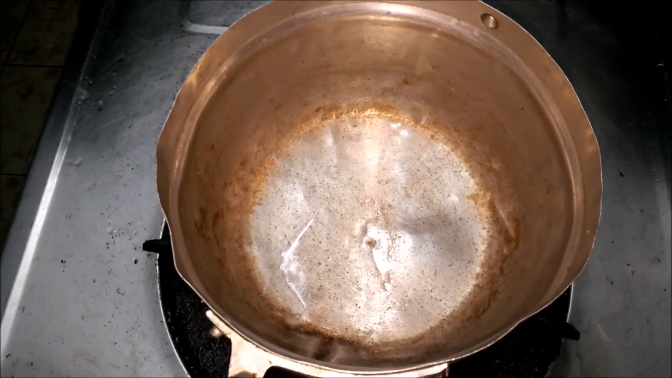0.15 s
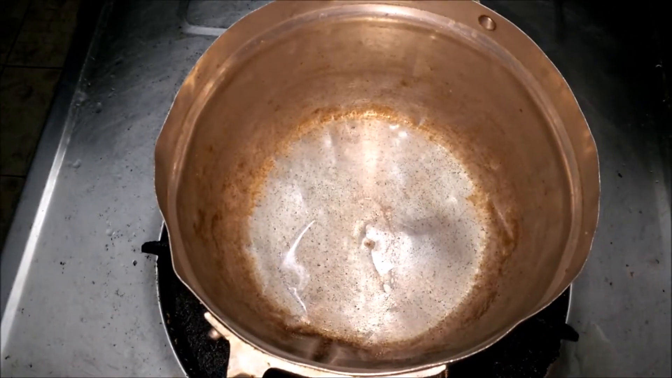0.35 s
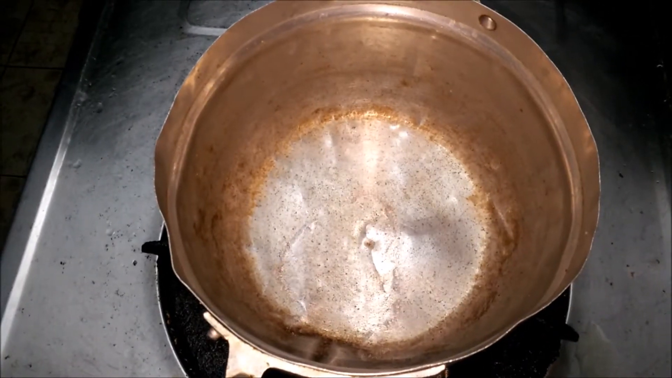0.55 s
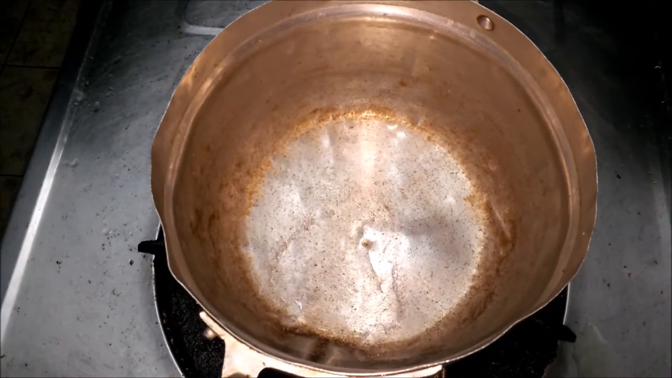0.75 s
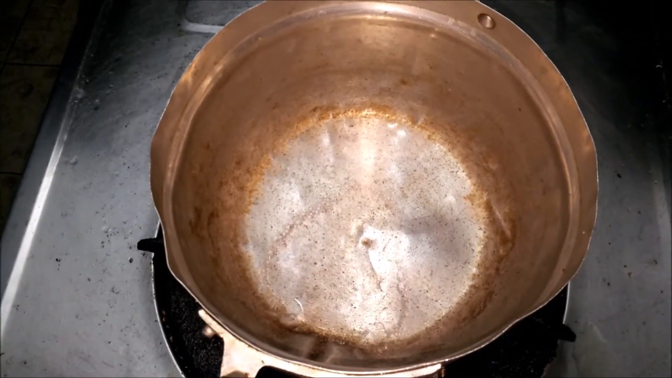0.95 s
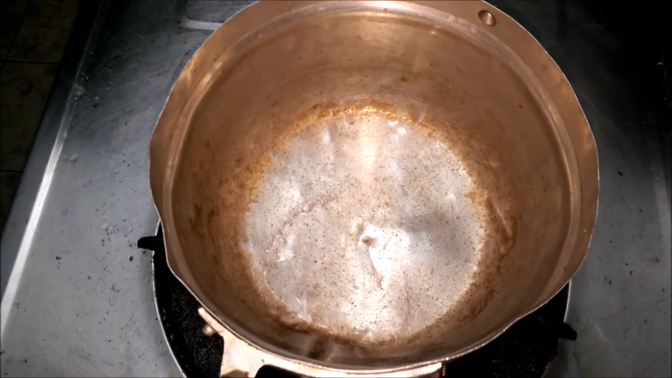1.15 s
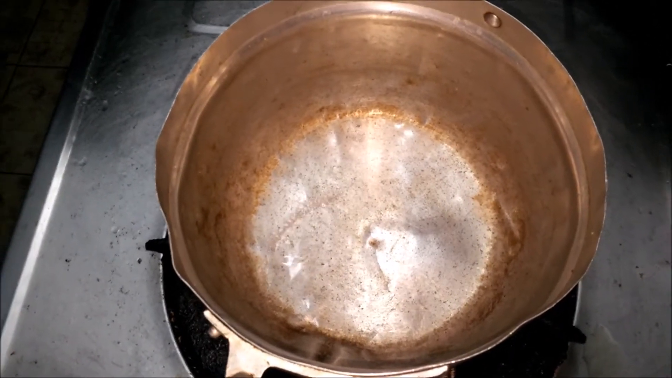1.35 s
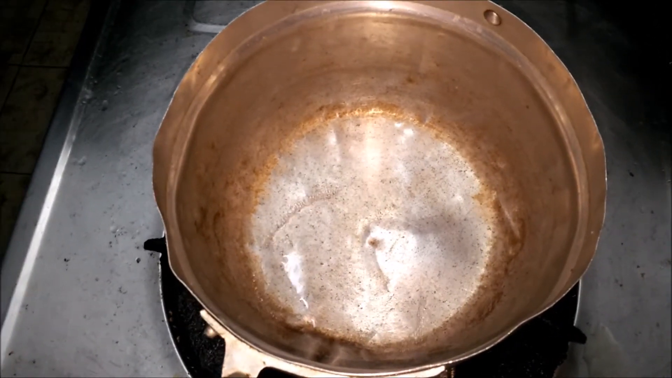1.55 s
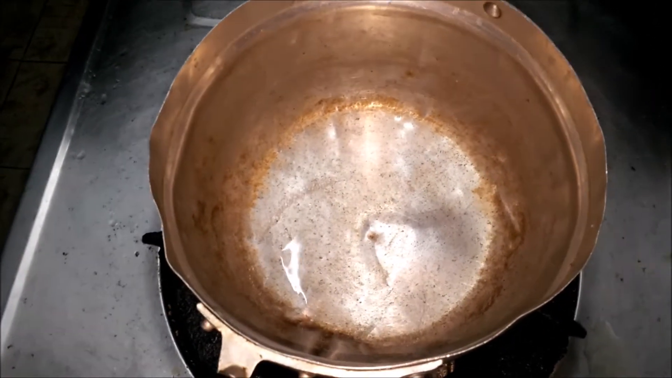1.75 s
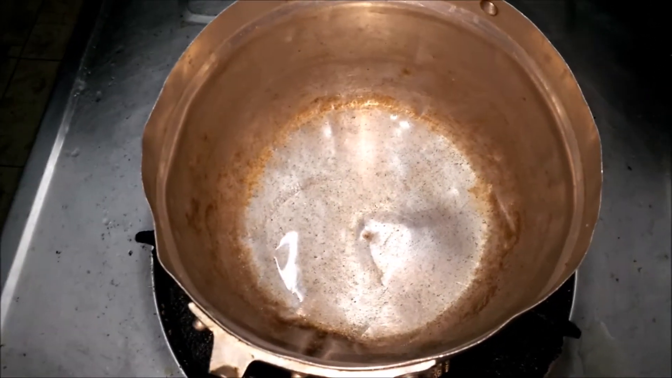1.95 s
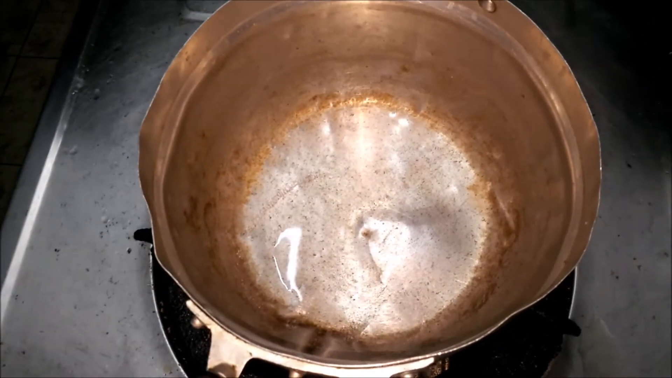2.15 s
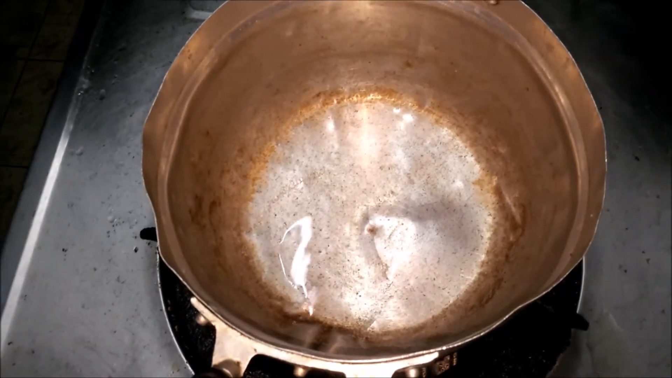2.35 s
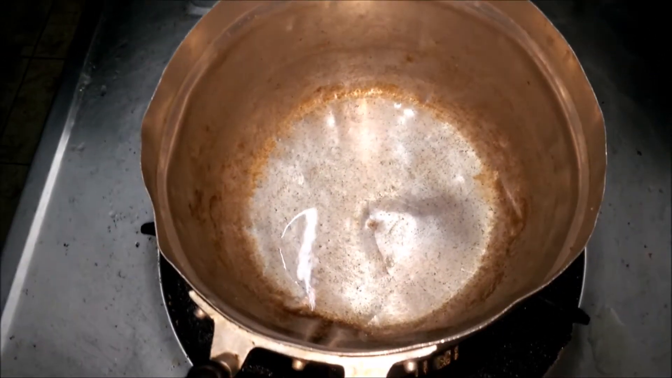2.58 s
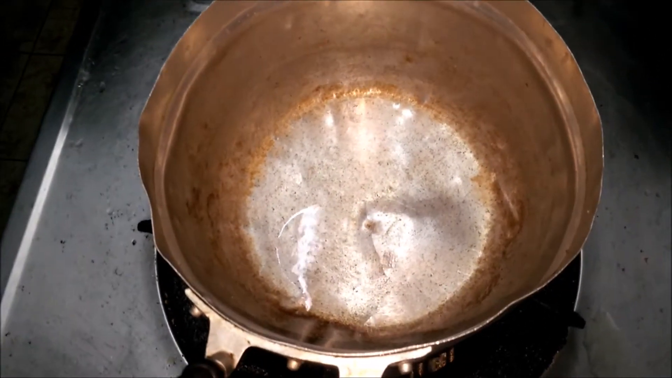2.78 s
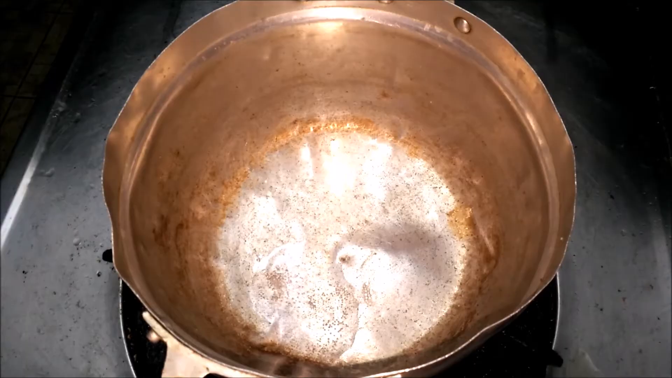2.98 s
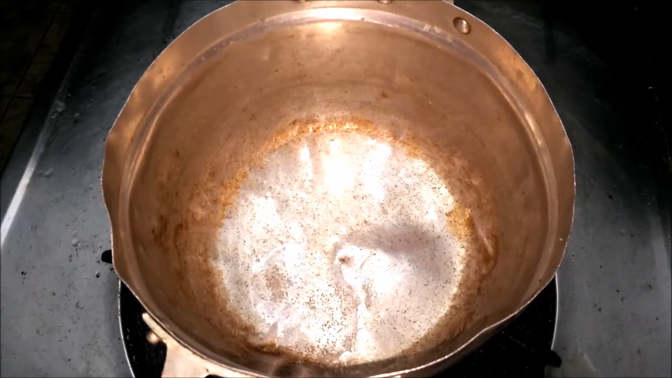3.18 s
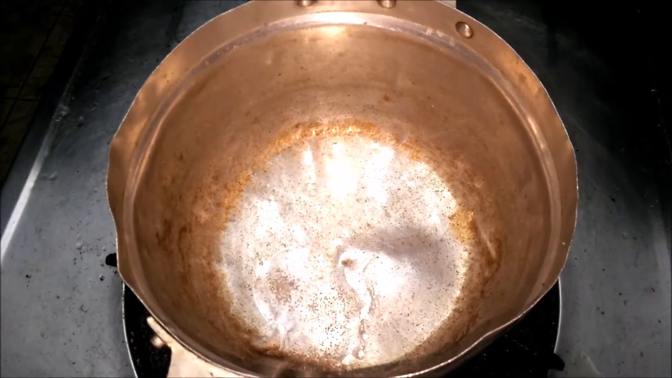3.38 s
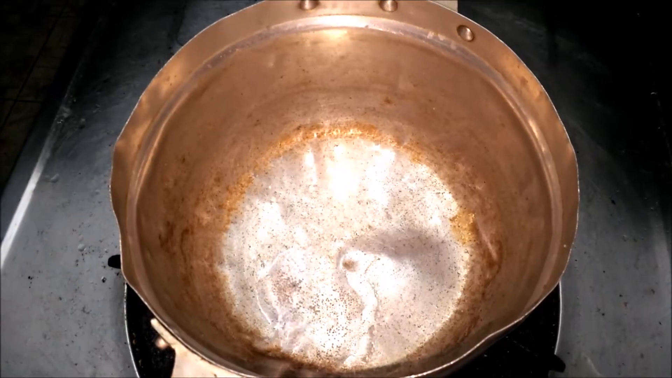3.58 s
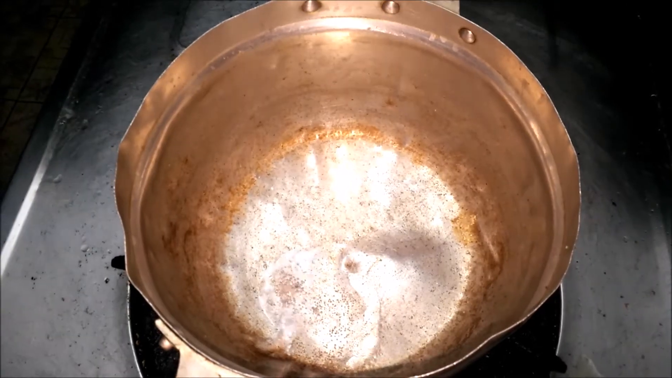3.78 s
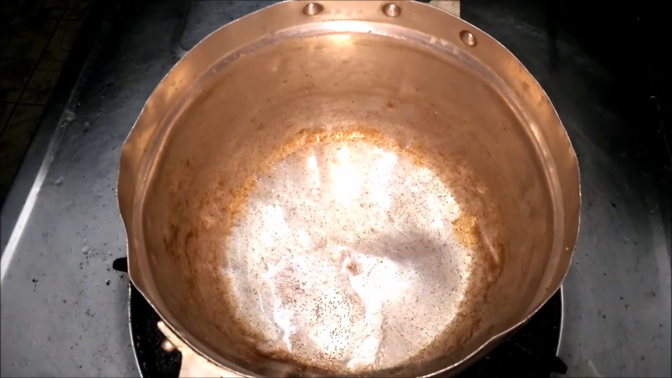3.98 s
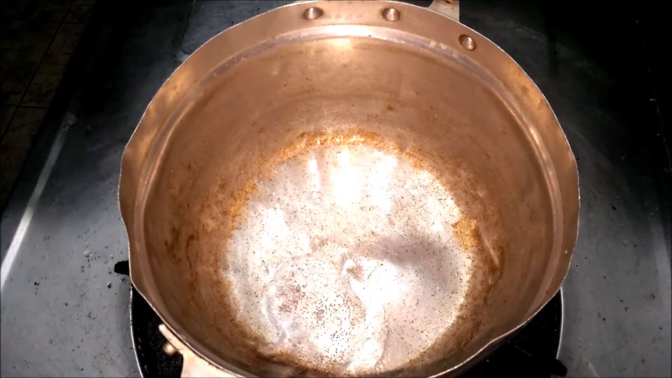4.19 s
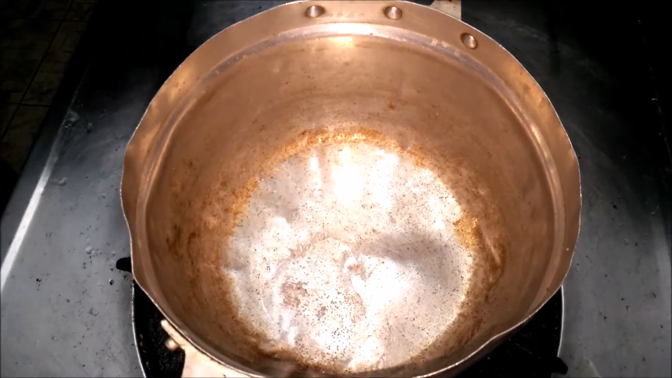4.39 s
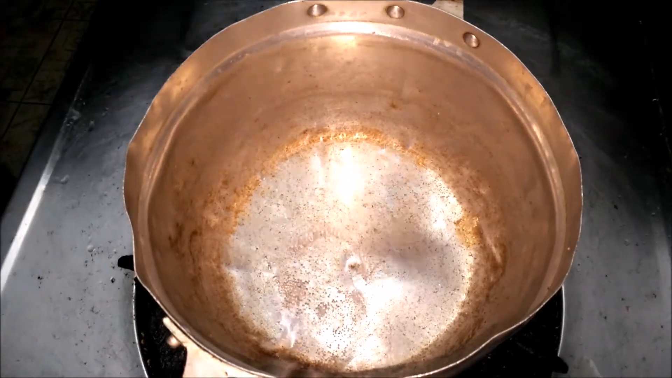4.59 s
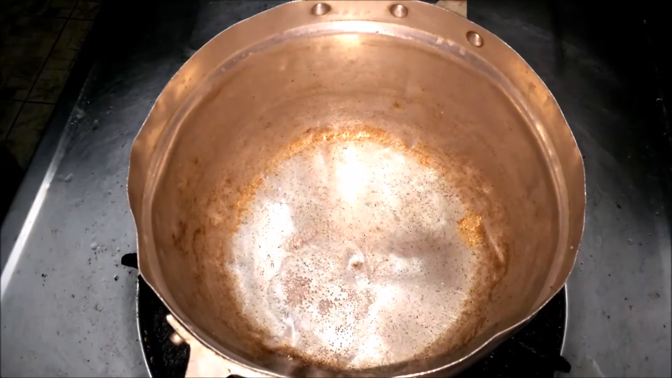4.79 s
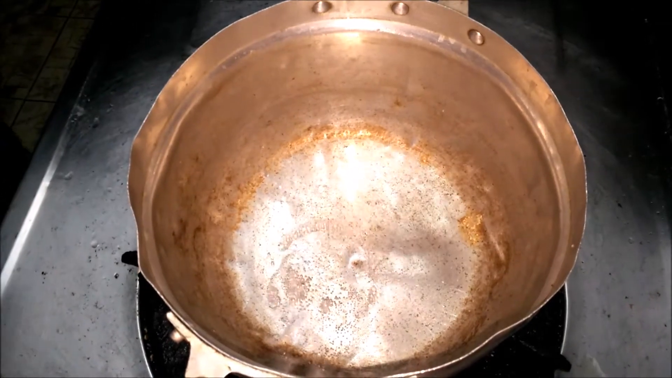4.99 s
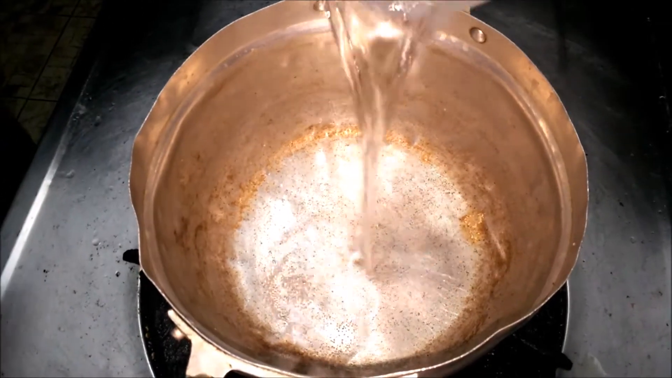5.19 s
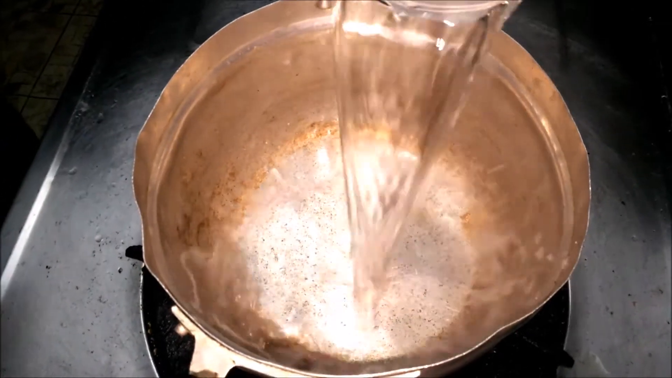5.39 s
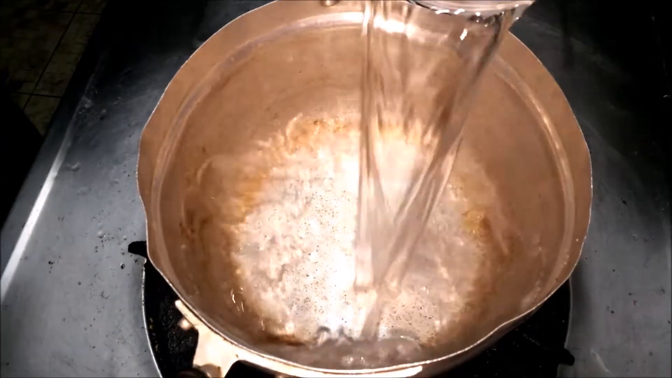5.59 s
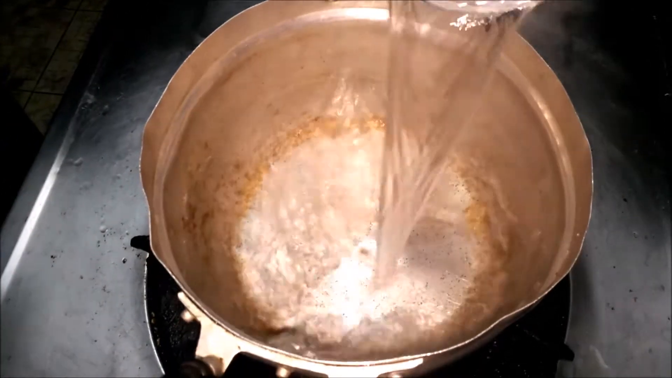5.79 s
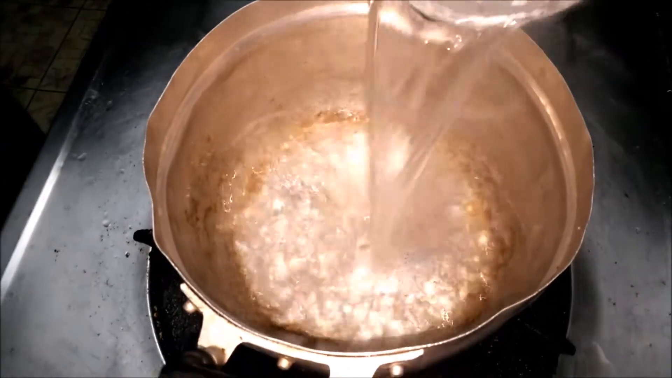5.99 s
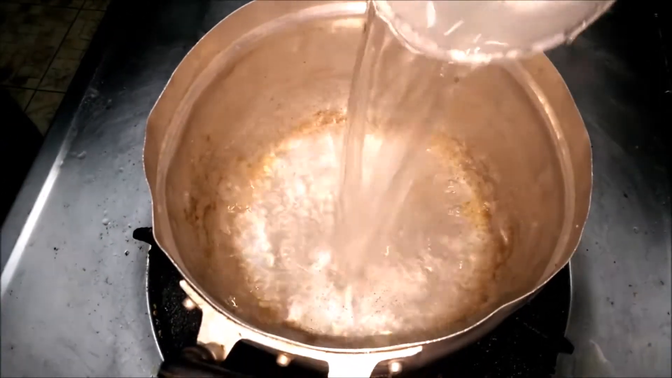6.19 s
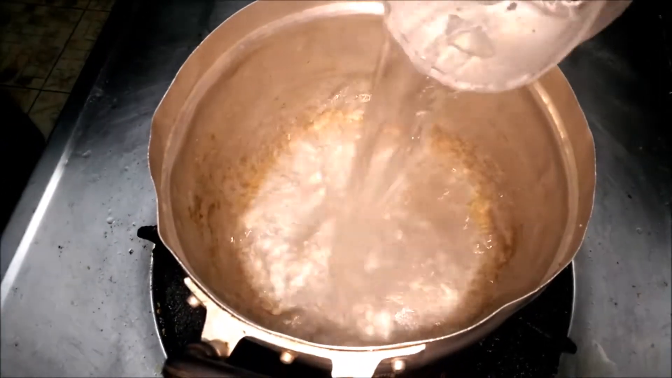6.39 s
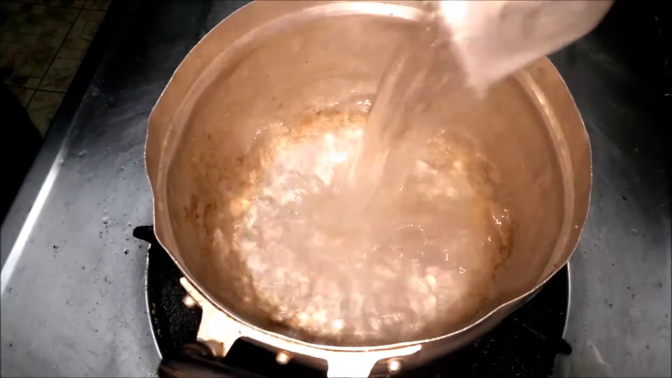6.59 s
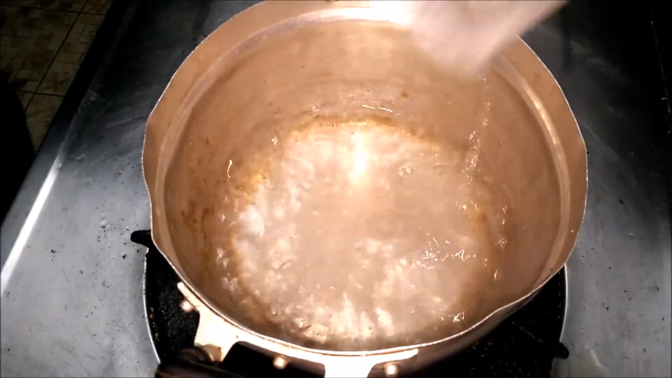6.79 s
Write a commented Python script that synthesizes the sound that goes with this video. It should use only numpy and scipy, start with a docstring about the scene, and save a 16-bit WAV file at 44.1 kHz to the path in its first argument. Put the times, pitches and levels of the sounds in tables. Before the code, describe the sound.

Close pops and sizzling from a hot pan thin out, seething swells softly, then water hits with a loud hiss and settles into patchy bubbling.

```python
"""Over a gas burner, close to a thin hot pot: oil sizzles and spits, then water is poured in, flashes to steam
with a harsh roar, and settles to bubbling. Sizzle and boil are noise in patches and tiny bursts, the pot's air
gives the seething its tones, pops are cracks with echoes, and bubbles are short rising tones. A low rumble,
fullest during the pour, lies under it, and two microphone ports colour it all."""
import sys
import numpy as np
from scipy import signal
from scipy.fft import rfft, irfft, next_fast_len
from scipy.io import wavfile
from scipy.ndimage import uniform_filter1d, map_coordinates

SR = 44100
rng = np.random.default_rng(int(sys.argv[2]) if len(sys.argv) > 2 else 0)


def generate_wav(signal):
    """Clip the signal to [-1, 1] and save it as 16-bit WAV at the path in sys.argv[1]."""
    frames = np.transpose(np.atleast_2d(signal))
    scaled = np.clip(frames, -1, 1) * 32767
    pcm = np.round(scaled).astype(np.int16)
    wavfile.write(sys.argv[1], SR, pcm)


N = 301930

# Low rumble, fullest during the pour. Each row: time in seconds, level in dB.
RUMBLE_LEVEL = [(0.0, -77), (1.01, -78.5), (3.03, -78), (3.09, -72.5), (3.85, -76), (4.06, -62.5),
                (4.1, -68.5), (5.19, -75), (5.22, -62), (5.36, -44), (5.74, -59), (5.91, -85), (6.5, -77),
                (6.52, -68), (6.67, -73), (6.85, -60)]
# Colour of the rumble above its deepest part. Each row: frequency in Hz, relative density in dB per Hz.
RUMBLE_COLOUR = [(53, -50), (90, -14), (232, -6), (285, -2), (420, -6.5), (550, -10), (920, -120)]
# Puffs of air on the ports. Each row: centre in seconds, level in dB, half length to 1/e in seconds.
PUFFS = [(4.14, -76, .02), (4.2, -80, .02), (4.98, -84, .04), (6.55, -78, 0.05)]

# Sharp pops: spitting oil, and later pops at the rim. Each row: start in seconds, peak in dB,
# depth (low end) in dB, sharpness (high end) in dB, left minus right in dB.
POPS = [(0.0024, -2, -25, -20.5, -3.5), (0.038, -2, -16, -26, 3), (0.0695, -5.5, -18, -22, -5),
        (0.1201, -9, -16, -15, 1), (0.2134, -12, -26, -14, 1.5), (0.2894, -11.5, -33, -25, -14),
        (0.3044, -2.5, -23, -25, -2), (0.384, -2.5, -23.5, -31, -3), (0.4164, -13, -23, -10, -10),
        (0.423, 1, -26.5, -26.5, -2), (0.4289, -7.5, -24, -25, -3), (0.4554, -14, -30, -15, 1.0),
        (0.5372, -15, -13, -8, -4), (0.5493, -1, -23, -25, -1), (0.6268, -8.5, -21, -23, -5),
        (0.668, -4.5, -23, -12, -2), (0.8748, -5.5, -21.5, -19, 1.5), (0.9125, -3, -31, -21, -5.5),
        (0.9172, -7, -28, -19.5, 13), (0.9462, -15, -31, -16, -6), (0.9926, -8, -21, -9, 1.0),
        (1.0166, -1, -29.5, -29, 4.5), (1.0784, -8, -28, -17.5, -1), (1.3464, -3, -12, -29.5, 3),
        (1.3964, -14, -13, -17, 1), (1.509, -10.5, -24, -8, 3), (1.5407, -7, -30, -26, -2),
        (1.832, -11, -24, -16, -8), (1.8798, -4.5, -24, -21.5, -8), (1.9124, -3, -31, -22.5, -2),
        (1.946, -12, -27, -24, -18), (1.9666, -11, -33, -17, 1.0), (1.986, -15.5, -39, -22, -22),
        (2.152, -15, -32, -16, -7), (2.209, -12, -35, -21, -6), (2.286, -13, -26, -18, -3),
        (2.304, -14.5, -32, -16, -1), (2.3643, -5, -28.5, -24.5, -6.5), (2.417, -12.5, -28.5, -25, -6),
        (2.5187, -20, -27, -15, 0.5), (4.4847, -21, -10, -20, -3), (6.434, -9.5, -23, -20, -1),
        (6.5655, -25, -27, -26, 11.0), (6.6884, -20, -22, -18, 0), (6.8144, -4.5, -39, -29.5, 3)]
# Echoes inside the pot. Each row: frequency in Hz, time to fall 60 dB in seconds.
WALL_DECAY = [(1500, 0.017), (4000, 0.046), (8000, 0.07), (13000, 0.011)]
# Large bubbles and plops. Each row: start in seconds, level before the soft attack in dB,
# starting pitch in Hz, time to fall 60 dB in seconds.
BUBBLES = [(5.229, -22.5, 625, 0.044), (5.258, -22, 612, 0.078), (5.955, -26.5, 1740, 0.019),
           (6.058, -32.5, 1410, 0.055), (6.172, -34, 1530, 0.033), (6.251, -34, 2080, .02),
           (6.3, -16, 3050, 0.012), (6.328, -23.5, 1510, 0.018), (6.331, -26, 3240, 0.028),
           (6.332, -31, 2700, 0.025), (6.349, -31, 1500, 0.027), (6.405, -27, 3560, 0.014),
           (6.43, -40, 1880, 0.072), (6.458, -28.5, 2940, 0.038), (6.5, -38.5, 712, 0.046),
           (6.512, -39, 800, 0.03), (6.625, -33.5, 2670, .015), (6.657, -28, 3570, 0.017),
           (6.72, -27, 3980, 0.022), (6.772, -36, 675, .04), (6.835, -24, 3470, 0.027)]

# The boil, first of the oil, then of the water. Each row: time in seconds, fine fizz in dB, sharpness (fizz
# above 10.2 kHz against the rest) in dB, gurgle in dB, lowest pot tone in dB, left minus right of the fizz
# in dB, spatter in dB. Levels are those between surges, flares and wobbles.
OIL_BOIL = [(0.0, -34.5, -4, -59, -54, -5, -46.5), (0.26, -37.5, -1.5, -56, -64.5, -0.5, -55),
            (0.55, -35.5, -2, -57, -60, 0, -50), (0.7, -38, -1.5, -58, -61, -4, -53),
            (0.96, -40.5, -0.5, -58.5, -60, 1, -56.5), (1.25, -41.5, -3.5, -60.5, -60, 8.5, -54.5),
            (1.57, -41, 1.5, -56.5, -63, 3.5, -52.5), (1.76, -43, -3, -63, -66.5, 4.5, -57),
            (1.89, -39, 1, -58.5, -62, 0.5, -55.5), (2.08, -53, -2, -62, -68, 6, -67),
            (2.22, -44, 0.5, -64, -68, 3.5, -60.5), (2.6, -57.5, -4.5, -67, -70, 0.5, -70),
            (2.75, -55, -6, -63, -67.5, 13.5, -61.5), (2.81, -51.5, -2, -67, -69.5, 2, -62.5),
            (3.11, -52, -5.5, -62.5, -63.5, 8.5, -61.5), (3.39, -44.5, 0, -59, -60.5, -3, -53),
            (3.62, -45.5, 1, -55.5, -61.5, -7.5, -54), (3.79, -39.5, -4, -60, -60.5, -4, -49.5),
            (4.07, -38.5, -3, -57, -55, 4.5, -55), (4.48, -39, -3.5, -55.5, -57.5, -1, -51.5),
            (4.75, -39.5, -5, -56, -59.5, 12, -58), (4.8, -36.5, -7, -61, -55.5, 7.5, -50.5),
            (4.96, -42.5, -1, -59, -57, 22.0, -54.5), (5.22, -39.5, -4, -59, -56.5, 5, -49.5)]
WATER_BOIL = [(5.228, -40, -7, -51, -39, 3, -44), (5.236, -15.5, -7, -46, -38, 5.6, -41.5),
              (5.25, -19.5, -6, -49, -54, 5.0, -40), (5.264, -21, -7, -47, -36.5, 1.1667, -39),
              (5.304, -9.5, -5, -41, -52, 2.5, -29), (5.354, -10.5, -6.5, -30.5, -39.5, 1, -20),
              (5.7, -10.5, -5, -28.5, -38.5, 1.3, -17), (5.75, -12, -6.5, -25, -39.5, 1.8, -20),
              (5.812, -15.5, -6.5, -35.5, -50, 4.1, -24), (5.862, -24, -7, -41, -50, 4.5, -33.5),
              (5.904, -31.5, -6, -46, -62, 4.7, -35.5), (5.966, -29, -6.5, -44.5, -57, 0.5, -40),
              (6.016, -23.5, -2, -46.5, -57.5, 2.3, -42.5), (6.092, -32.5, -4.5, -51, -53.5, 0.33, -42),
              (6.206, -44.5, -6.5, -56.5, -60.5, 2.5, -51.5), (6.47, -37.5, -8, -52, -62.5, 1, -47),
              (6.502, -37.5, -8, -57, -62, 0.5, -44), (6.602, -39.5, -12, -55.5, -62.5, 13.5, -53.5),
              (6.646, -43, -15, -59, -64, 7, -50), (6.664, -53, -7, -60, -70, 6.0, -54),
              (6.696, -31, -7, -47.5, -62, 4.6, -48), (6.764, -24.5, -10, -49, -55, 4.1, -40.5),
              (6.804, -33.5, -3, -58, -58, 1.5, -55), (6.846, -20, -12, -54, -51, 6.5, -43)]
# Pockets of steam breaking out. Each row: peak in seconds, lift of the gurgle in dB, lift of the fizz in dB,
# length of the swell to 1/e in seconds.
STEAM_SURGES = [(2.71, -0.5, 4, 0.045), (2.916, -1, 4, 0.038), (3.015, 1, 6.5, 0.011),
                (3.246, 12, 9.5, 0.047), (3.426, 7.5, 1.5, 0.041), (3.65, 2, 2, 0.047),
                (3.826, 6.5, 1, .04), (3.95, 5.5, 1.5, 0.073), (4.491, 16.5, 4.5, 0.028),
                (4.65, 0, 4.5, 0.041), (6.317, 7.5, 3.5, 0.027)]
# Fizz, peaked by the microphone ports. Each row: frequency in Hz, relative density in dB per Hz.
FIZZ_COLOUR = [(2650, -65), (4500, -26), (4840, -23.5), (6280, -19.5), (7230, -9), (7510, -7), (8000, -3),
               (10100, -11), (13100, -13), (14300, -19.5)]
# Spatter of larger bubbles. Each row: frequency in Hz, relative density in dB per Hz.
SPATTER_COLOUR = [(1710, -31.5), (2900, -6), (3230, -7.5), (4200, -6.5), (4550, -7.5), (6000, -3.5),
                  (7800, -12.5), (13200, -120)]
# Air in the pot: lowest tone, second tone, higher tones. Each row: frequency in Hz, width in Hz, strength in dB.
POT_LOWEST = [(617, 142, -1.5), (1026, 1000, -12), (420, 550, -23)]
POT_SECOND = [(1408, 127, 4.5), (1010, 130, -10.5)]
POT_HIGHER = [(1750, 490, -3.5), (2140, 256, 3.5), (2630, 390, -1)]

# Likeness of the two sides of the boil. Each row: frequency in Hz, correlation [1 = alike].
SIDE_LIKENESS = [(60, 0.75), (150, 1), (370, 1), (930, 0.68), (2330, -0.048), (5810, 0.14), (14500, -0.014)]
# Colour of the two microphone ports. Each row: frequency in Hz, left minus right in dB.
PORT_COLOUR = [(60, -7), (120, -4), (240, 3.5), (470, -5.0), (930, -1), (1850, -2), (3680, -8), (7310, 4.5),
               (14500, -6.5)]

LAG_S = 5 / SR  # the left port is the farther one
TOP_HZ = 14350  # top of the sound's band

DEEP_DB = -22  # deepest rumble against the rest
SURGE_TRAILS = 1.7  # fall of a surge over its rise
SURGE_TONE, SURGE_RUMBLE = 0.34, 0.34  # shares of the gurgle's lift

SPITS, SPITS_END_S = 24, 2.55
SPIT_DB, SPIT_SPREAD_DB = 14, 8  # least peak over the fizz, range above that
SPIT_DEPTH_DB, SPIT_SHARP_DB = -26, -17

BEADS, BEADS_START_S = 700, 3.1
BEAD_DB, BEAD_SPREAD_DB = -2, 11  # least level over the gurgle, range above that
BEAD_HZ, BEAD_LOG_RANGE, BEAD_CYCLES = 1360, 1.03, 32  # lowest pitch, natural-log range, 60 dB fall in cycles

# Fizz thrown up by each pop: power against the pop's peak, before its rise and fall are applied.
FLARE_DB, FLARE_POWER_RISE_S, FLARE_POWER_FALL_S = -32.5, 0.0079, 0.068
SPATTER_FLARES = 0.83  # share of the fizz's flares and surges that the spatter follows
# The second pot tone lies between the lowest (0) and the spatter (1), and takes a share of the surges.
SECOND_DB, SECOND_LEANS, SECOND_SURGES = -7, 0.7, 0.43


def amp(db):
    """Gain of a level in dB."""
    return 10 ** (np.asarray(db) / 20)


def unit(x):
    """x at rms 1."""
    return x / np.sqrt(np.mean(x ** 2) + 1e-20)


def along(points, hz):
    """(Hz, value) points read on a log axis."""
    f, v = np.transpose(points)
    return np.interp(np.log(hz + 1), np.log(f + 1), v)


def curves(rows):
    """One value per sample for each column after the time."""
    s, *columns = np.transpose(rows)
    return [np.interp(np.arange(N) / SR, s, column) for column in columns]


def wobble(rate):
    """A smooth random curve, rate knots a second."""
    knots = rng.standard_normal(int(N * rate / SR) + 4)
    return map_coordinates(knots, [np.arange(N) * rate / SR])


def filtered(x, response):
    """x times a complex response of frequency."""
    m = next_fast_len(N + 8192)
    return irfft(rfft(x, m) * response(np.fft.rfftfreq(m, 1 / SR)), m)[..., :N]


def coloured(points):
    """Response that follows a table of (Hz, dB)."""
    return lambda hz: amp(along(points, hz))


def sides(db):
    """Left and right gains for a left-right difference in dB."""
    return amp(np.array([db / 2, -db / 2]))


def surges():
    """Lift of gurgle and fizz in dB: each pocket of steam swells quickly and trails off."""
    t = np.arange(N) / SR
    lift = 0
    for s, *db, length in STEAM_SURGES:
        width = np.where(t < s, length, SURGE_TRAILS * length)
        lift = lift + np.outer(db, np.exp(-((t - s) / width) ** 2))
    return lift


def rumble():
    """Lumpy low noise, unrelated at the two ports; its deepest part comes in gusts and puffs."""
    t = np.arange(N) / SR
    level_db = curves(RUMBLE_LEVEL)[0] + SURGE_RUMBLE * surges()[0]
    puffs = sum(amp(db) * np.exp(-((t - s) / length) ** 2) for s, db, length in PUFFS)
    low = filtered(rng.standard_normal((2, N)), coloured(RUMBLE_COLOUR))
    low = unit(low * amp(2.0 * wobble(15.0)))
    deep_band = lambda hz: hz ** 2 / (hz ** 2 + 45 ** 2) / (1 + (hz / 110) ** 6)
    deep = filtered(rng.standard_normal((2, N)), deep_band)
    deep = unit(deep * amp(6 * np.array([wobble(7), wobble(7)])))
    return amp(level_db) * low + (amp(level_db + DEEP_DB) + puffs) * deep


def beads():
    """Small bubbles at random moments, in rows like the large ones; higher ones die sooner."""
    s, gurgle_db = np.transpose(OIL_BOIL + WATER_BOIL)[[0, 3]]
    u, tone, size = rng.random((BEADS, 3)).T
    when = BEADS_START_S + u * (N / SR - BEADS_START_S)
    hz = BEAD_HZ * np.exp(BEAD_LOG_RANGE * tone)
    db = np.interp(when, s, gurgle_db) + BEAD_DB + BEAD_SPREAD_DB * size
    return list(zip(when, db, hz, BEAD_CYCLES / hz))


def bubbles():
    """Each bubble rings briefly and rises in pitch as it nears the surface."""
    out, t = np.zeros(N + SR), np.arange(SR // 8) / SR
    for s, db, hz, t60 in BUBBLES + beads():
        ring = np.sin(2 * np.pi * hz * t * (1 + 0.0094 * t / t60))
        attack = 1 - np.exp(-t / 0.0014)
        out[round(s * SR):][:len(t)] += amp(db - 60 * t / t60) * attack * ring
    return np.array([out[:N], out[:N]])


def spits():
    """Small pops at random moments, in rows like the large ones."""
    s, fizz_db = np.transpose(OIL_BOIL)[:2]
    rows = []
    for u, v, w in rng.random((SPITS, 3)):
        when = SPITS_END_S * u
        peak_db = np.interp(when, s, fizz_db) + SPIT_DB + SPIT_SPREAD_DB * v
        rows.append((when, peak_db, SPIT_DEPTH_DB, SPIT_SHARP_DB, 20 * (w - .5)))
    return rows


def wall_wash(n):
    """Noise for the echoes off the pot wall: it dies at its own pace in each band and differs by port."""
    hz, t, z = signal.stft(rng.standard_normal((2, n)), SR, nperseg=64)
    decay = amp(-60 * t / along(WALL_DECAY, hz)[:, None])
    return signal.istft(z * decay, SR, nperseg=64)[1][:, :n]


def pops():
    """Each pop is a faint breath of noise, a sharp crack, its echo from the far side, then a wall wash."""
    n, lead = 2048, 512  # samples; the lead leaves room for the filter's ringing ahead
    wait = round(.0015 * SR)  # faint noise before the crack
    out, f = np.zeros((2, N + 3 * n)), np.fft.rfftfreq(2 * n, 1 / SR)
    for s, db, depth_db, sharp_db, pan_db in POPS + spits():
        wash = np.roll(wall_wash(n), wait, axis=1)
        after = np.arange(n) - wait
        crack = rng.standard_normal(n) * amp(np.where(after < 0, -30, -60 * after / SR / 0.003) - 13)
        crack[wait] = 1
        echo = .35 * np.roll(crack, round(SR * rng.uniform(.0015, .003)))
        colour = amp(along([(150, -90), (300, depth_db - 31), (1000, depth_db - 18),
                            (2500, depth_db + 4.5), (4500, depth_db + 7.5), (6000, -13.5),
                            (8500, 0), (10500, sharp_db + 16), (14000, sharp_db + 17)], f))
        pop = np.pad(crack + echo + amp(-18) * wash, ((0, 0), (lead, 0)))
        pop = irfft(rfft(pop, 2 * n) * colour)
        pop = pop / np.abs(pop.mean(0)).max()
        start = round(s * SR)
        out[:, start:start + 2 * n] += amp(db) * sides(pan_db)[:, None] * pop
    return out[:, lead:N + lead]


def flares():
    """Strength of the fizz thrown up by the large pops, whose powers add."""
    kicks, t = np.zeros(N), np.arange(SR) / SR
    for s, db, *_ in POPS:
        kicks[round(s * SR)] += amp(2 * (db + FLARE_DB))
    shape = np.exp(-t / FLARE_POWER_FALL_S) * (1 - np.exp(-t / FLARE_POWER_RISE_S))
    return np.sqrt(np.abs(signal.fftconvolve(kicks, shape)[:N]))


def pot_air(modes, low_hz):
    """Resonances of the air in the pot, alternating in sign, cut steeply below low_hz."""
    def response(f):
        total = sum((-1) ** k * amp(db) * 1j * f * w / (c * c - f * f + 1j * f * w)
                    for k, (c, w, db) in enumerate(modes))
        return total / (1 + (low_hz / (f + 1)) ** 4)
    return response


def bursting(response, patchy_db, rate, spread_db, share):
    """Stereo noise in patches, mixed with a power share of tiny bursts of uneven size, rms 1."""
    z = signal.stft(rng.standard_normal((2, N)), nperseg=256)[2]
    field = uniform_filter1d(rng.standard_normal(z.shape[1:]), size=4, axis=0)  # over frequency
    field = uniform_filter1d(field, size=10, axis=1)  # over time
    patches = unit(signal.istft(z * amp(patchy_db * unit(field)), nperseg=256)[1][:, :N])
    size = (rng.random(N) < rate / SR) * amp(spread_db * np.minimum(rng.exponential(size=N), 4))
    life = signal.lfilter([1], [1, -.9], size)  # each burst lasts a fraction of a millisecond
    bursts = unit(life * rng.standard_normal((2, N)))
    pair = np.sqrt(1 - share) * patches + np.sqrt(share) * bursts

    def mid_side(hz):
        turn = np.arccos(np.clip(along(SIDE_LIKENESS, hz), -1, 1)) / 2
        return response(hz) * [np.cos(turn), np.sin(turn)]
    mid, side = filtered(pair, mid_side)
    return unit(np.array([mid + side, mid - side]))


def boil():
    """Small bubbles fizz, larger ones spatter, and the seething bottom sounds through the pot's air."""
    calm_db, sharp_db, gurgle_db, seethe_db, pan_db, spatter_db = curves(OIL_BOIL + WATER_BOIL)
    lift_db, fizz_lift_db = surges()
    fizz_db = 20 * np.log10(np.hypot(amp(calm_db + fizz_lift_db), flares()))
    gurgle_db = gurgle_db + lift_db
    seethe_db = seethe_db + SURGE_TONE * lift_db
    spatter_db = spatter_db + SPATTER_FLARES * (fizz_db - calm_db)
    second_db = SECOND_DB + seethe_db + SECOND_LEANS * (spatter_db - seethe_db) + SECOND_SURGES * lift_db
    shared = wobble(22)  # all layers waver together, each by its own amount

    fizz = bursting(coloured(FIZZ_COLOUR), patchy_db=1.5, rate=1400, spread_db=5.0, share=0.15)
    edge = unit(filtered(fizz, lambda hz: hz > 10200))
    core = unit(filtered(fizz, lambda hz: hz <= 10200))
    spatter = bursting(coloured(SPATTER_COLOUR), patchy_db=3, rate=980, spread_db=4.5, share=0.091)
    gurgle = bursting(pot_air(POT_HIGHER, 1020), patchy_db=2.5, rate=1400, spread_db=2.0, share=0.085)
    second = bursting(pot_air(POT_SECOND, 890), patchy_db=2.0, rate=560, spread_db=12.5, share=0.065)
    seethe = bursting(pot_air(POT_LOWEST, 330), patchy_db=1.5, rate=240, spread_db=-5, share=0.069)

    fine = amp(fizz_db + 0.17 * shared) * (core * sides(pan_db) + amp(sharp_db) * edge)
    coarse = amp(0.8 * shared) * (amp(spatter_db) * spatter + amp(gurgle_db) * gurgle)
    tones = amp(second_db + 1.4 * wobble(25)) * second + amp(seethe_db + 0.54 * wobble(25)) * seethe
    return fine + coarse + amp(0.74 * shared) * tones


def scene():
    """Everything in and under the pot."""
    return rumble() + bubbles() + pops() + boil()


def record(dry):
    """The ports differ in colour and distance; the sum is limited to full scale, then cut above its band."""
    def ports(hz):
        delay = np.exp(np.outer([-1, 1], 1j * np.pi * hz * LAG_S))  # half the lag on each side
        return sides(along(PORT_COLOUR, hz)) * delay
    limited = np.clip(filtered(dry, ports), -1, 1)
    return filtered(limited, lambda hz: hz < TOP_HZ)


dry = scene()
out = record(dry)
generate_wav(out)
```